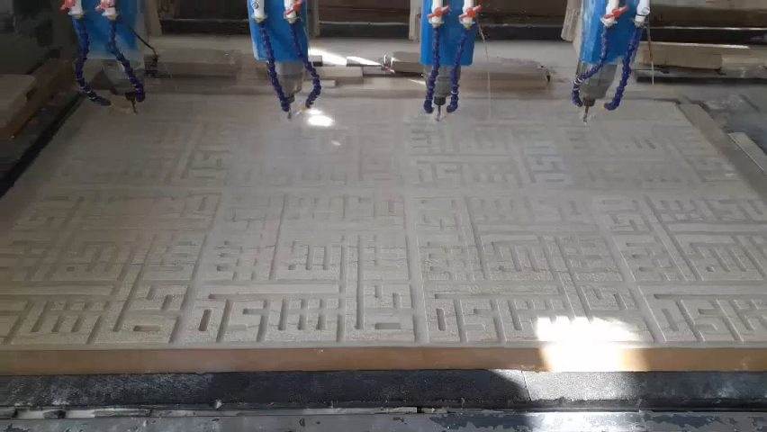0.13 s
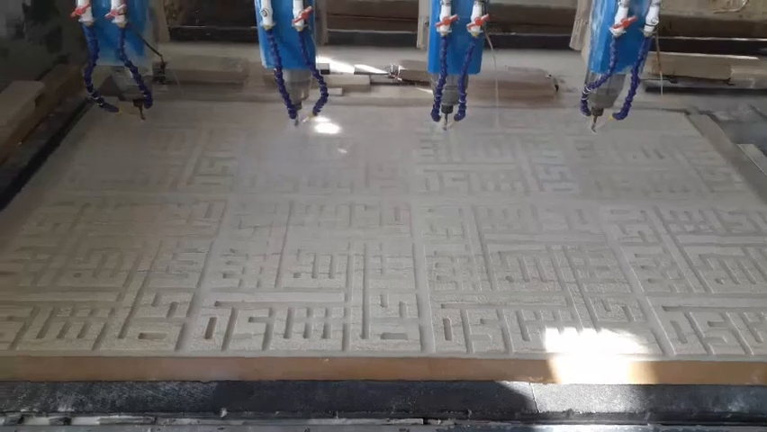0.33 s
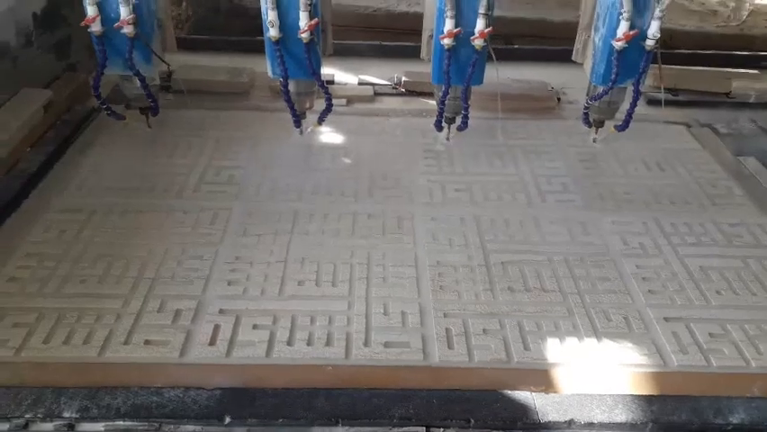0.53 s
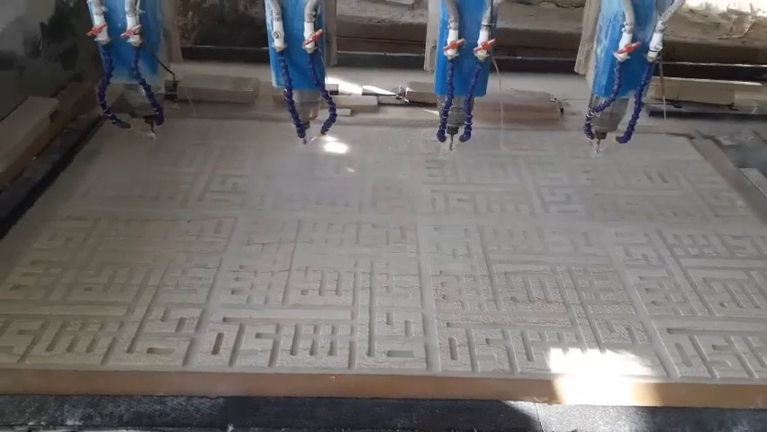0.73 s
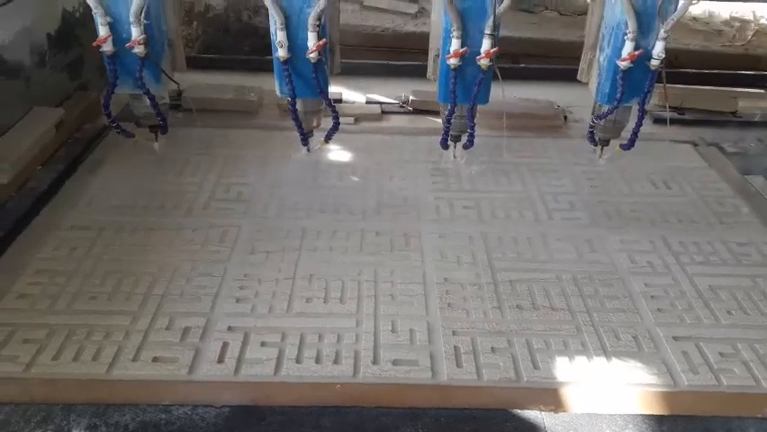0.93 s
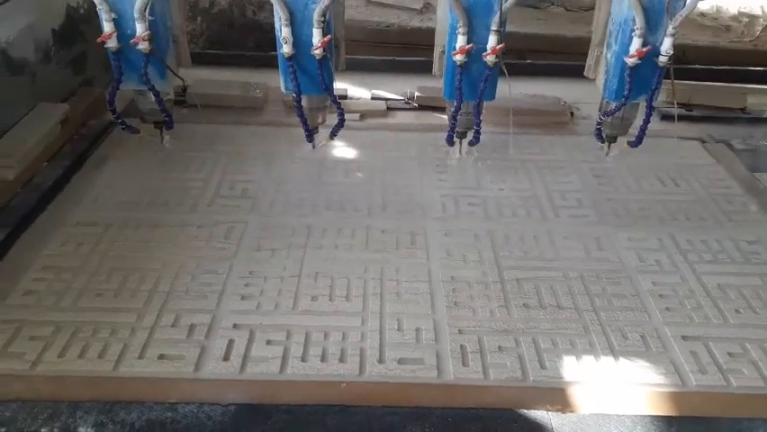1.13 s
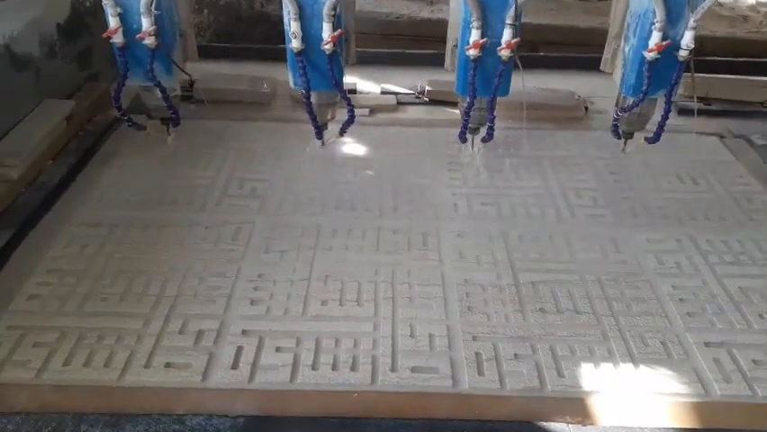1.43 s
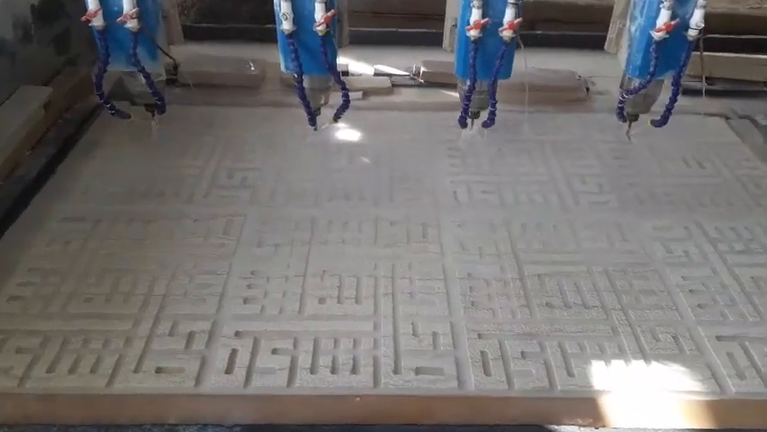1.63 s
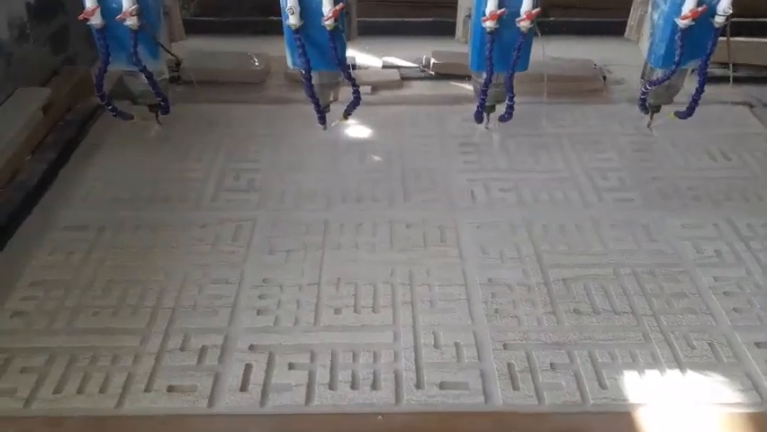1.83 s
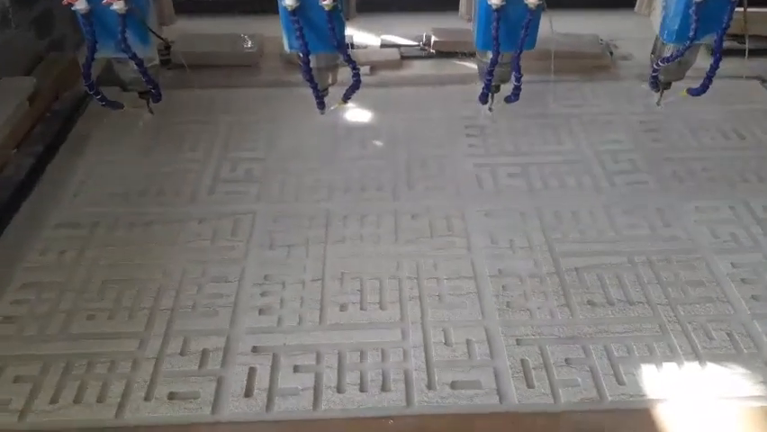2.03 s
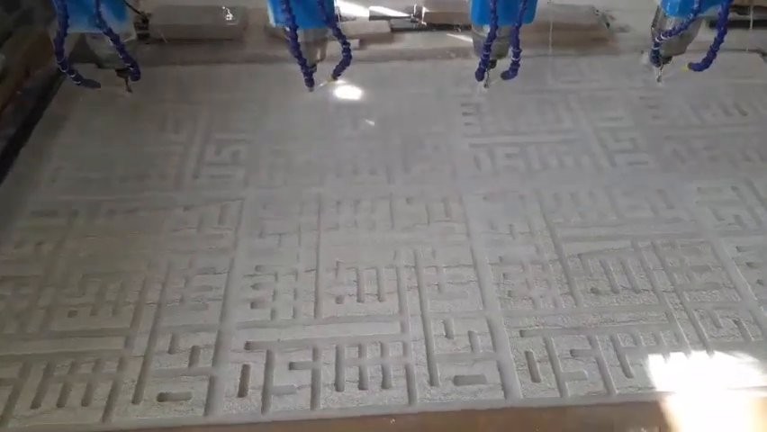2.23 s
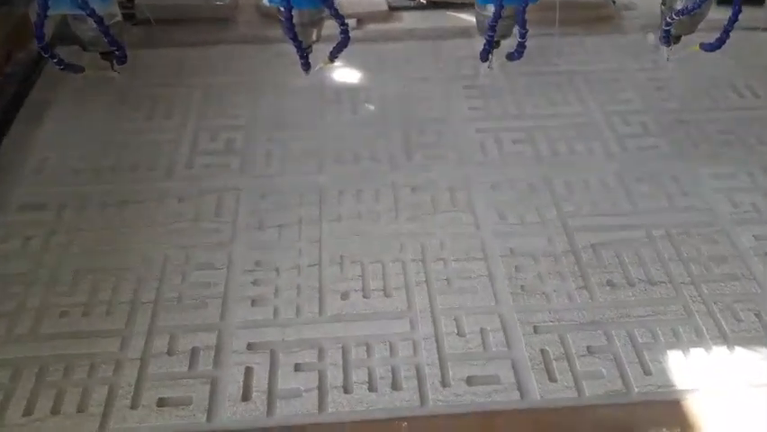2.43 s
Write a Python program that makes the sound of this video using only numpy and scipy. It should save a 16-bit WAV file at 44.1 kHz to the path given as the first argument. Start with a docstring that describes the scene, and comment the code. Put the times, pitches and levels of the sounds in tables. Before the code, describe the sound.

An engraving machine grinds stone with a loud, continuous whine and a gritty rasp.

```python
"""A workshop, where four spindles of an engraving machine grind grooves into a stone slab.
Each whines at multiples of about 400 turns a second and sags by its own amount as the bits bite,
three times over. Grit rasps once a turn and drives the tool shanks, which squeal near 7.4 kHz.
The feed drive hums and the shop rumbles underneath; the sound cuts in abruptly."""
import sys
import numpy as np
from scipy import signal
from scipy.fft import rfft, irfft
from scipy.io import wavfile
from scipy.ndimage import uniform_filter1d, minimum_filter1d

SR = 44100
rng = np.random.default_rng(int(sys.argv[2]) if len(sys.argv) > 2 else 0)


def digitize_waveform(pressure):
    """Quantize a signal to 16-bit integers and store it at the path in sys.argv[1].

    Rows of a 2-D input are taken as channels; values are limited to [-1, 1].
    """
    field = np.atleast_2d(pressure).T
    bounded = np.clip(field, -1, 1)
    quanta = np.round(bounded * 32767).astype(np.int16)
    wavfile.write(sys.argv[1], SR, quanta)


N = 114660
T = np.arange(N) / SR
HZ = np.fft.rfftfreq(N, 1 / SR)
IDLE_HZ = 401.93  # turning rate without load
BIT_FLUTTER_DB, BIT_FLUTTER_HZ = 2.5, 46

# turning rate under the average load: t/s, f/Hz
TURNING_RATE = [(.12, 391), (.25, 390.5), (.41, 384), (.47, 393), (.62, 392.5), (.78, 399.5), (.88, 391),
                (.98, 389), (1.13, 391), (1.29, 386), (1.4, 392.5), (1.66, 397), (1.8, 391), (1.97, 393),
                (2.1, 388), (2.19, 385), (2.24, 393), (2.35, 394), (2.48, 400.5), (2.6, 400)]
# strength of the grinding: t/s, relative rasp level/dB, relative dust level/dB
GRINDING = [(0.12, -13, -32.5), (0.19, -14.5, -31.5), (0.47, -15.5, -32), (0.49, -16, -27),
            (0.55, -21.5, -42.5), (0.79, -24, -38.5), (0.98, -15.5, -34), (1.0, -18.5, -35.5),
            (1.39, -18, -40), (1.42, -23.5, -41.5), (1.5, -24.5, -45), (1.74, -22.5, -40),
            (1.79, -16.5, -35.5), (2.23, -16, -32.5), (2.26, -18.5, -27.5), (2.29, -23, -44.5),
            (2.39, -24, -38), (2.6, -19.5, -34)]


def amp(db):
    """Amplitude ratio of a level in decibels."""
    return 10 ** (np.asarray(db) / 20)


def unit_rms(x):
    """Normalisation to mean power 1."""
    return x / np.sqrt(np.mean(x ** 2) + 1e-20)


def curve(rows, column=1):
    """Linear interpolation of a time table at every sample."""
    rows = np.array(rows, float)
    return np.interp(T, rows[:, 0], rows[:, column])


def gain_at(spectrum, hz):
    """Gain of a spectrum table, interpolated over log frequency."""
    f, db = np.transpose(spectrum)
    return amp(np.interp(np.log(hz + 1), np.log(f + 1), db))


def filtered(x, gain):
    """Linear filtering by a gain per frequency, scaled to rms 1."""
    return unit_rms(irfft(rfft(x) * gain, N))


def drift(rate_hz):
    """Low-pass noise: random fluctuation up to about rate_hz."""
    return filtered(rng.standard_normal(N), (HZ > 0) / (1 + (HZ / rate_hz) ** 4))


def flutter(depth_db, rate_hz):
    """Log-normal fluctuation of gain, with mean power 1."""
    return unit_rms(amp(depth_db * drift(rate_hz)))


def partial(angle, depth_db, rate_hz):
    """A sinusoid under random amplitude modulation."""
    return np.sqrt(2) * np.cos(angle + 2 * np.pi * rng.random()) * flutter(depth_db, rate_hz)


def shop_rumble():
    """Random vibration of the table and the shop gives low broadband noise."""
    # rumble envelope: t/s, relative level/dB
    envelope = [(0.13, -38.5), (0.5, -46), (0.53, -40.5), (0.61, -43), (1.82, -47.5), (1.84, -44.5),
                (2.55, -45.5), (2.6, -41)]
    # rumble spectrum: f/Hz, relative density level/dB
    spectrum = [(20, -30), (35, -24), (48, -12), (80, -13), (100, -2), (150, -2.5), (300, 4), (550, -4),
                (900, -4.5), (2000, -3.5), (6000, -39)]
    return amp(curve(envelope) + 9) * filtered(rng.standard_normal(N), gain_at(spectrum, HZ))


def reverberation(x, t60_s=.27, wet_db=-5.5):
    """Sparse room reflections decay exponentially after the direct sound."""
    t = T[:SR // 2]
    taps = rng.standard_normal(len(t)) * (rng.random(len(t)) < 2000 / SR)  # 2000 echoes a second
    taps *= amp(-60 * t / t60_s)
    wet = signal.fftconvolve(x, taps / np.linalg.norm(taps))[:N]
    return (x + amp(wet_db) * wet) / np.hypot(1, amp(wet_db))


def feed_drive(hum_hz=252.3):
    """Periodic vibration of the gantry motors gives four harmonics of constant pitch."""
    # first harmonic of the hum: t/s, level/dB
    fundamental = [(0.13, -34), (0.15, -34), (1.12, -36), (1.2, -34.5), (1.83, -38.5), (1.97, -30),
                   (2.19, -35.5), (2.32, -27.5), (2.6, -34)]
    # second harmonic: t/s, level/dB
    octave = [(0.13, -43), (0.34, -52), (0.38, -40), (0.62, -48.5), (1.79, -41), (1.85, -34), (2.08, -43),
              (2.3, -35), (2.39, -44), (2.6, -44)]
    levels_db = [curve(fundamental), curve(octave), -41, -41]
    return sum(amp(db) * partial(2 * np.pi * k * hum_hz * T, .73, 13.6)
               for k, db in enumerate(levels_db, 1))


def shaft_angle(sag_share, unsteadiness=1):
    """Angle is the integral of turning rate, which falls and fluctuates more under load."""
    sag_hz = IDLE_HZ - curve(TURNING_RATE)
    jitter_hz = unsteadiness * unit_rms(abs(sag_hz) + 7) * (.9 * drift(12) + 3 * drift(90.5))
    return 2 * np.pi * np.cumsum(IDLE_HZ - sag_share * sag_hz + jitter_hz) / SR


def loaded_spindles():
    """Unequal loads detune the spindles, so they beat; gives the angle and gain of each."""
    # spindles: sag/average sag, relative level/dB
    spindles = [(.72, -6), (.95, 0), (1.07, -2), (1.25, -7)]
    gains = amp([db for _, db in spindles])
    gains /= np.linalg.norm(gains)
    return [(shaft_angle(share), gain) for (share, _), gain in zip(spindles, gains)]


def stone_abrasion(buzz, grit):
    """Source and filter: periodic and random contact forces are shaped into rasp, dust and scraping."""
    # cleanness of the cut: t/s, level of buzz over grit/dB
    cleanness = [(.12, 7), (.28, 4), (.45, -1), (.62, -5), (.78, -3), (.92, 6), (1.28, 6), (1.5, -5),
                 (1.66, -2), (1.82, 7), (2.0, 6), (2.25, 0), (2.38, -5), (2.55, -3)]
    # hard bites that end a cut: t/s, 1/e half-width/s, added rasp level/dB
    bites = [(.49, .025, 3.5), (2.255, .018, 2.5)]
    # spectra of rasp, fine dust and coarse scraping: f/Hz, relative density level/dB
    rasp_spectrum = [(40, -55), (150, -19), (500, -21), (750, -6.5), (1050, -10), (1450, 1.5), (1800, -6.5),
                     (2330, 0), (2700, -1.5), (3150, 0), (3600, -0.5), (4350, 2), (5100, 1.5), (6300, -0.5),
                     (7000, 2), (7900, -2.5), (8700, -7), (9200, -5.5), (9800, -23), (11000, -37)]
    dust_spectrum = [(100, -45), (7000, -16), (9500, 2), (10800, -1), (12500, 4.5), (14000, -1),
                     (15500, -1.5)]
    scrape_spectrum = [(30, -57), (500, -18.5), (900, -8), (1120, 1.5), (1400, -11.5), (1750, -4.5),
                       (2400, -18), (5000, -27.5)]
    # coarse scraping in the slab: t/s, relative level/dB
    scrape_envelope = [(0.13, -33), (0.24, -28.5), (0.49, -36.5), (0.51, -35), (0.66, -36.5), (1.0, -39),
                       (1.06, -33), (1.34, -29), (1.45, -34), (2.08, -31.5), (2.23, -30.5), (2.34, -35),
                       (2.57, -42), (2.6, -36.5)]
    colour, clean = gain_at(rasp_spectrum, HZ), amp(curve(cleanness))
    bite_db = sum(db * np.exp(-((T - at) / width) ** 2) for at, width, db in bites)
    rasp = (clean * filtered(buzz, colour) + filtered(grit, colour)) / np.hypot(clean, 1)
    dust = filtered(grit + 1.1 * rng.standard_normal(N), gain_at(dust_spectrum, HZ))
    scrape = filtered(grit, gain_at(scrape_spectrum, HZ))
    return (amp(curve(GRINDING) + bite_db + 1.07) * rasp
            + amp(curve(GRINDING, column=2) - 1.5) * dust
            + amp(curve(scrape_envelope) + 2) * scrape)


def shank_mode(force, centre_hz, half_width_hz):
    """Resonance: a shank responds mainly to forces near its natural frequency."""
    return filtered(force, 1 / (1 + 1j * (HZ - centre_hz) / half_width_hz) ** 2)


def shank_squeal(buzz, grit, centre_hz=7402, half_width_hz=310):
    """Forced vibration: buzz and grit drive the main resonance of the shanks."""
    # squeal envelope: t/s, relative level/dB
    envelope = [(0.12, -17), (0.27, -9), (0.28, -18), (0.34, -10), (0.54, -16), (0.56, -23), (0.9, -18),
                (0.97, -13), (1.1, -16.5), (1.1, -24), (1.37, -17.5), (1.46, -35), (1.62, -19), (1.77, -29),
                (1.85, -16.5), (2.01, -20), (2.19, -13.5), (2.32, -34), (2.34, -21), (2.52, -21.5),
                (2.54, -13.5), (2.6, -24)]
    tonal = shank_mode(buzz, centre_hz, half_width_hz)
    noisy = shank_mode(grit, centre_hz, half_width_hz)
    ring = unit_rms(tonal + amp(-4) * noisy)
    ring /= np.sqrt(uniform_filter1d(ring ** 2, size=2200))  # level held even over 50 ms
    return amp(curve(envelope) - 3.5) * ring * flutter(2, 100)


def cutting(bits):
    """Periodic impact: each bit strikes once a turn, exciting stone and shank with buzz and grit."""
    buzz = unit_rms(sum(gain * partial(k * angle, BIT_FLUTTER_DB, BIT_FLUTTER_HZ)
                        for angle, gain in bits for k in range(6, 25)))
    bursts = sum(gain * (1 + .56 * np.cos(angle)) * rng.standard_normal(N) for angle, gain in bits)
    grit = unit_rms(bursts * flutter(2, 1800))  # fast flutter makes it grainy
    stone = stone_abrasion(buzz, grit)
    squeal = shank_squeal(buzz, grit)
    load_db = curve(GRINDING) - curve(GRINDING).mean()
    upper_mode = amp(load_db - 44) * shank_mode(buzz, centre_hz=9170, half_width_hz=170)
    return (stone + upper_mode) * flutter(1, 35) + squeal


def spindle_whine(bits):
    """Rotational harmonics: those of free running give way to lower, rougher ones under load."""
    # envelopes of harmonics 1 to 5: t/s, relative level/dB
    first = [(0.13, -28), (0.27, -27.5), (0.41, -42), (0.53, -29), (1.14, -28), (1.28, -36.5), (1.33, -57),
             (1.41, -35.5), (1.55, -27.5), (1.67, -34), (1.84, -27.5), (2.04, -27.5), (2.11, -30),
             (2.6, -26.5)]
    second = [(0.13, -29), (0.17, -40), (0.3, -23), (0.44, -43), (0.46, -30), (0.53, -28.5), (1.04, -29),
              (1.13, -23), (1.28, -34), (1.42, -25), (1.5, -45), (1.76, -21), (1.84, -22.5), (1.91, -36),
              (2.08, -21.5), (2.13, -24.5), (2.18, -34.5), (2.27, -24), (2.48, -32), (2.6, -19.5)]
    third = [(0.13, -26), (0.17, -22.5), (0.51, -20.5), (0.53, -17), (0.69, -30), (0.84, -20.5),
             (0.89, -28.5), (1.26, -28.5), (1.28, -34), (1.36, -17), (1.53, -38), (1.58, -24), (1.9, -32),
             (1.92, -25), (2.12, -25), (2.23, -15), (2.33, -33.5), (2.6, -19.5)]
    fourth = [(0.13, -17.5), (0.22, -14.5), (0.27, -23), (0.31, -17), (0.35, -21), (0.52, -15),
              (0.56, -22.5), (0.85, -27.5), (0.99, -12), (1.1, -30.5), (1.23, -14.5), (1.32, -25),
              (1.34, -18), (1.51, -32), (1.84, -19.5), (1.86, -28.5), (2.04, -20.5), (2.1, -34),
              (2.13, -22), (2.24, -11.5), (2.3, -26.5), (2.6, -23.5)]
    fifth = [(0.13, -20), (0.78, -28.5), (1.15, -20.5), (1.16, -24), (1.48, -22), (1.53, -31.5),
             (2.02, -28), (2.05, -21), (2.59, -29.5), (2.6, -41)]
    # their make-up: relative free level/dB, relative loaded level/dB, free flutter/dB, sag/average sag
    make_up = [(-0.5, -19.5, 1, .5), (-.5, -12, 0.96, .5), (-4, -3.5, 1.5, 1.1), (-9.5, -1, 1, 1.1),
               (-6, -2, 6, 1.1)]
    # upper harmonics of free running: f/Hz, level/dB
    idle_spectrum = [(2400, -64), (2800, -55), (3200, -54), (3600, -35.5), (4000, -40), (4400, -40),
                     (4800, -37.5), (5600, -63), (6400, -49), (6820, -37), (7220, -37), (7620, -43),
                     (8020, -59.5), (8420, -60), (8800, -62), (9220, -50), (9700, -65)]
    # harmonic 17, ringing just below the shank resonance: t/s, level/dB
    whistle = [(.13, -46), (.6, -33), (1.3, -45), (1.45, -48), (1.8, -39), (2.25, -38), (2.35, -23),
               (2.48, -34.5), (2.6, -32)]
    free_hz = IDLE_HZ - .12 * (IDLE_HZ - curve(TURNING_RATE)) + .669 * drift(14.14)
    free_angle = 2 * np.pi * np.cumsum(free_hz) / SR
    slack_db = .34 * (curve(GRINDING).mean() - curve(GRINDING))  # positive in light grinding
    whine = np.zeros(N)
    for k, envelope in enumerate([first, second, third, fourth, fifth], 1):
        free_db, loaded_db, flutter_db, sag_share = make_up[k - 1]
        chorus = sum(gain * partial(k * angle, BIT_FLUTTER_DB, BIT_FLUTTER_HZ) for angle, gain in bits)
        lead = partial(k * shaft_angle(sag_share, unsteadiness=1.125), 1.24, 22)
        loaded = unit_rms(lead + amp(-5.5) * chorus)
        free = partial(k * free_angle, flutter_db, 23.4)
        free_gain, loaded_gain = amp(free_db + slack_db), amp(loaded_db - slack_db)
        blend = (free_gain * free + loaded_gain * loaded) / np.hypot(free_gain, loaded_gain)
        whine += amp(curve(envelope)) * np.hypot(amp(free_db), amp(loaded_db)) * blend
    for k in range(6, 25):
        whine += gain_at(idle_spectrum, k * IDLE_HZ) * partial(k * free_angle, 2.6, 25)
    return whine + amp(curve(whistle)) * partial(17 * free_angle, 1.2, 30)


def scene():
    """Superposition of shop and machine, alike in both channels."""
    bits = loaded_spindles()
    mono = shop_rumble() + spindle_whine(bits) + reverberation(cutting(bits)) + feed_drive()
    return np.array([mono, mono])


def record(dry):
    """Gating, peak limiting and low-pass filtering: an abrupt start and a bounded level and band."""
    start_s, ceiling, cutoff_hz = .1185, .95, 15620
    gated = dry * (T >= start_s)
    allowed_gain = np.minimum(1, ceiling / (abs(gated[0]) + 1e-9))
    limited = gated * uniform_filter1d(minimum_filter1d(allowed_gain, size=61), size=61)
    low_pass = signal.firwin(511, cutoff_hz, window=("kaiser", 9), fs=SR)
    return signal.oaconvolve(limited, low_pass[None], "same", axes=1)


dry = scene()
out = record(dry)
digitize_waveform(out)
```